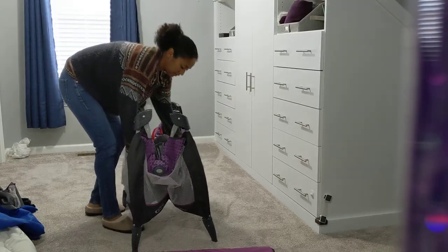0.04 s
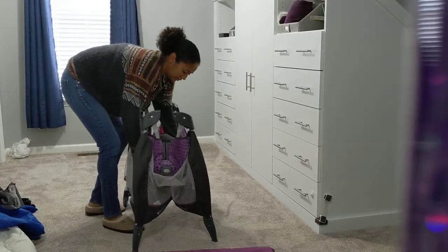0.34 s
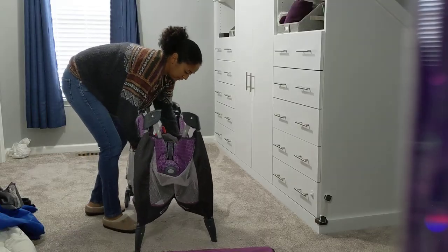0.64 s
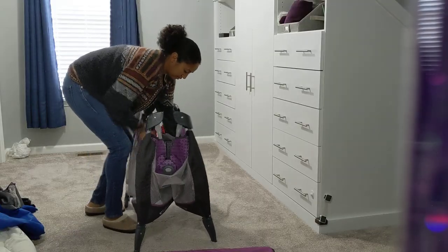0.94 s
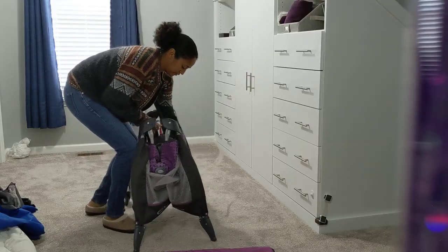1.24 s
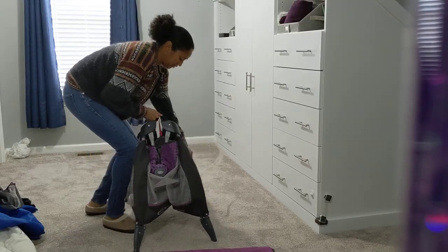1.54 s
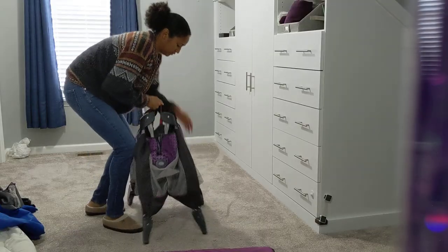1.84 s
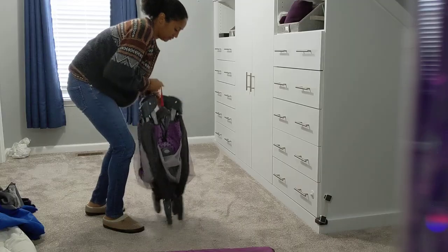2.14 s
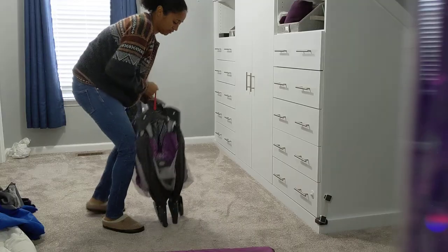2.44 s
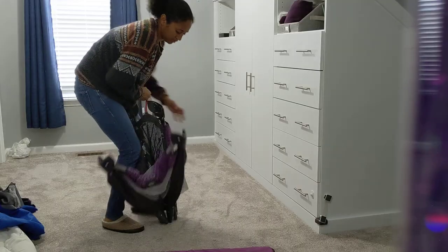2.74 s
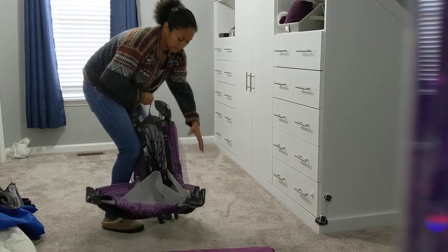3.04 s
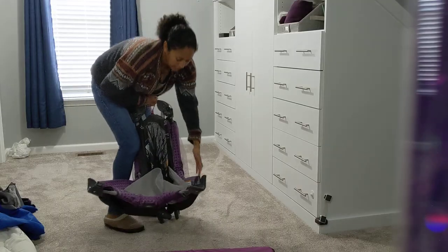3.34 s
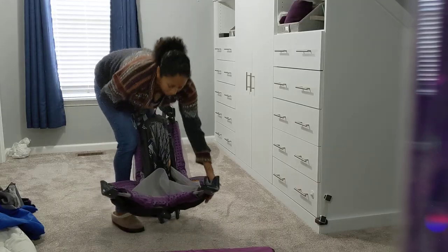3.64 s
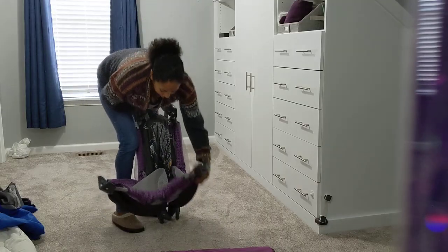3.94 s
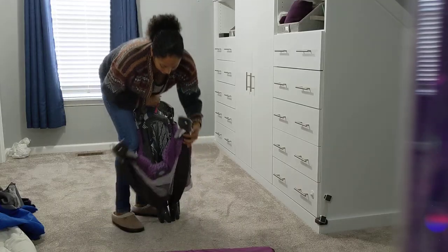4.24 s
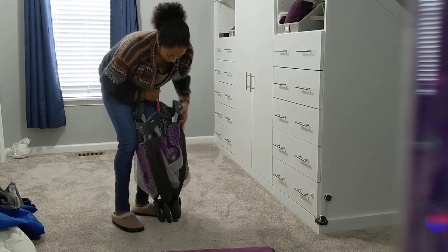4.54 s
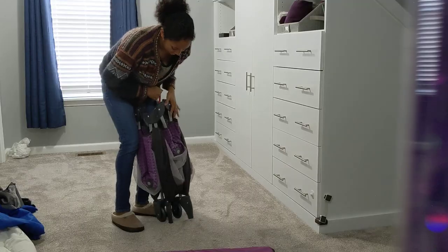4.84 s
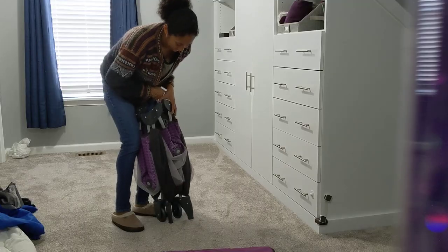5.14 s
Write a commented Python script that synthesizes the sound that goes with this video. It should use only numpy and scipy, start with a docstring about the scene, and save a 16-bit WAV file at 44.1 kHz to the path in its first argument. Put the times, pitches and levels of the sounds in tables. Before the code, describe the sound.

Locks snap and the legs of a folding cot clack together, amid nylon rustle, loose rattles and dull padded bumps.

```python
"""A carpeted bedroom, with a stereo pair of microphones close to a travel cot being folded up.
Over the quiet rumble of the house, nylon rustles, loose joints rattle and padded parts bump dully.
In front, the locks let go, the legs clap together and the top rails drop and are lifted again:
each click cracks a plastic shell and sets the metal tubes and plastic hubs ringing."""
import sys
import numpy as np
from scipy import signal
from scipy.fft import rfft, irfft
from scipy.io import wavfile

SR = 44100
rng = np.random.default_rng(int(sys.argv[2]) if len(sys.argv) > 2 else 0)


def unload_audio(sound):
    """Save the sound as a 16-bit wav file, at the path given as the first command line argument."""
    columns = np.transpose(np.atleast_2d(sound))
    # keep every value between -1 and 1, then stretch to whole-number steps
    steps = np.round(np.clip(columns, -1, 1) * 32767)
    wavfile.write(sys.argv[1], SR, steps.astype(np.int16))


N = 229496

# Clicks of locks and joints; ring and snap are relative to the level:
# (time [s], level [dB], ring [dB], pitch of the struck part [Hz], snap [dB], chatter [s])
CLICKS = [(.004, -50, 2.5, 1340, -6.5, .004), (0.086, -61.5, -1, 1640, -18, 0.009),
          (.308, -52.5, 3, 1684, -3.5, .003), (.572, -44, 2, 1739, -5.5, 0.003),
          (.59, -48, -18, 1805, -.5, .002), (.602, -52.5, -7, 1730, -8, 0.0019),
          (.646, -69, 9, 1690, -15, 0.0025), (.665, -73, 11.5, 935, -15, 0.0036),
          (0.911, -47, -4, 1654, -9, 0.0037), (1.011, -48.5, -20, 1380, 1.5, 0.003),
          (1.032, -54.5, 4, 1400, -15, 0.0069), (1.104, -46, -5, 1415, -6, 0.0084),
          (1.145, -45, 3, 1593, 1.5, 0.0029), (1.229, -45.5, -7, 1650, 0, 0.0024),
          (1.275, -43.5, -6, 1590, -5, .0033), (1.284, -34, -1.5, 1602, 1, 0.0026),
          (1.298, -41.5, -7, 1535, 1, 0.0027), (1.657, -61.5, -17, 1670, 5.5, .004),
          (1.844, -52, 1, 1745, -6, 0.0028), (1.909, -37, 3, 1726, -5, .002),
          (1.921, -29, -2.5, 1720, -0.5, 0.0019), (1.979, -32.5, -4, 1760, -2, 0.005),
          (2.059, -52, -2, 1670, 1, 0.0057), (2.265, -34.5, 1, 1416, -10, .003),
          (2.272, -23.5, 2, 1446, 1, 0.0067), (2.288, -26, -9.5, 1700, 2, 0.0028),
          (2.602, -50, -0.5, 1745, -1.5, 0.0039), (2.643, -55, 3, 1770, -14, 0.0087),
          (2.679, -55.5, 0.5, 1580, -18, .003), (2.751, -55, 1.5, 1734, 2.5, .0035),
          (2.805, -38, -17, 1640, -2, 0.0055), (2.862, -39.5, -18, 1750, -27, 0.014),
          (2.895, -42, -5, 1670, -23, 0.0048), (2.919, -36, -6.5, 1720, -1, 0.0048),
          (2.95, -38, -4.5, 1660, -4.5, 0.003), (3.169, -53, -7.5, 1930, -8, 0.0014),
          (3.991, -59, 3, 1674, -2, 0.013), (4.039, -49, -0.5, 1700, -11, .005),
          (4.094, -48.5, 7, 1685, 2, 0.0073), (4.119, -44, -9, 1880, -7.5, 0.0034),
          (4.365, -55, 1, 1706, -11, 0.019), (4.461, -48, -9.5, 1650, -5, 0.011),
          (4.737, -49, 4, 1640, 4, 0.0065), (4.793, -48.5, -23, 1400, -3, 0.0017),
          (4.829, -54.5, 1.5, 1390, -10, .005)]
# Modes of the metal tubes and of the plastic hubs: (frequency [Hz], level [dB], t60 [s])
TUBE_MODES = [(1476, -6, 0.041), (1678, -6, 0.063), (1716, -2, 0.08), (2206, -10.5, 0.086),
              (3253, -1, 0.031), (3285, -2, 0.044), (3574, -18, 0.037), (3792, -5.5, 0.045),
              (4310, -4.5, 0.044)]
HUB_MODES = [(477, -25, .1), (880, -10.5, 0.06), (1013, -9.5, 0.12), (1166, 0, 0.057), (1299, 0.5, 0.098),
             (1403, 5, 0.046), (1460, -7, 0.068), (1564, 6, 0.04), (2470, -3.5, 0.1), (2490, -20, 0.053),
             (3058, -9, 0.049), (3124, -10, 0.15), (3450, -30, 0.054), (3642, -10.5, 0.13),
             (3450, -15.5, 0.12), (3957, -3, 0.12)]
# Spectra of a plastic shell's crack and of the frame's low knock: (frequency [Hz], level [dB])
SHELL_SPECTRUM = [(250, -32), (750, -21), (1000, -10), (1180, -6.5), (1620, -1.5), (1980, -3.5), (2350, -5),
                  (2650, -4), (3100, 0.5), (3700, -1), (4700, -7.5), (5700, -13.5), (7000, -21),
                  (15000, -30)]
KNOCK_SPECTRUM = [(80, -37), (170, -10), (280, -21), (390, 0), (520, 1), (690, -8.5), (920, 3),
                  (1300, -6.5), (2500, -34)]


def amp(db):
    return 10 ** (np.asarray(db) / 20)


def unit(x):
    """Scales to energy 1."""
    return x / np.sqrt(np.sum(x ** 2) + 1e-20)


def value_at(points, hz):
    """A curve's value, on a log-frequency axis."""
    f, value = np.transpose(points)
    return np.interp(np.log(hz + 1), np.log(f), value)


def add(mix, s, sound):
    """Mixes a stereo sound in at time s."""
    part = mix[:, max(round(s * SR), 0):][:, :sound.shape[1]]
    part += sound[:, :part.shape[1]]


def impulse(spectrum):
    """The minimum-phase response with a given spectrum: a sharp start and a quick decay."""
    log_gain = np.log(amp(value_at(spectrum, abs(np.fft.fftfreq(4096, 1 / SR)))))
    return np.fft.ifft(np.exp(np.conj(signal.hilbert(log_gain)))).real[:2048]


def colour(x, spectrum):
    """Filters by a spectrum."""
    return signal.oaconvolve(x, impulse(spectrum))[:len(x)]


def diffuse(size):
    """Noise arriving from all sides at two closely spaced microphones."""
    # Likeness of left and right: (frequency [Hz], correlation [-1..1])
    likeness = [(60, 0.95), (130, 0.91), (290, 0.089), (500, -0.79), (900, 0.92), (1500, 0.67),
                (2600, -0.038)]
    a, b = rfft(rng.standard_normal((2, size)))
    same = np.clip(value_at(likeness, np.fft.rfftfreq(size, 1 / SR)), -1, 1)
    return irfft([a, same * a + np.sqrt(1 - same ** 2) * b], size)


def room_tone(level_db=-59):
    """Low rumble of the house with a faint hiss."""
    # The still bedroom: (frequency [Hz], level [dB])
    air_spectrum = [(15, -2.5), (42, -2), (90, -7), (140, -13), (290, -18.5), (420, -12), (540, -7),
                    (750, -25.5), (1200, -24), (2200, -35), (3500, -24), (7000, -29), (14000, -26),
                    (15200, -28.5)]
    return amp(level_db) * np.sqrt(N) * np.array([unit(colour(x, air_spectrum)) for x in diffuse(N)])


def blow(chatter_s, direct_db=-4, near_db=-5, near_s=0.0075, walls_db=-4, walls_s=0.038, size=16000):
    """Tiny contacts as two parts seat, their echoes off frame, wardrobe and walls, and the room's tail."""
    # Reverberation of the bedroom: (frequency [Hz], t60 [s])
    room_t60 = [(100, 0.34), (500, 0.39), (1500, 0.21), (3500, 0.32), (8000, 0.25), (15000, 0.098)]
    hz, frame_s, bands = signal.stft(diffuse(size), SR, nperseg=256)
    decay = amp(-60 * frame_s / value_at(room_t60, hz)[:, None])
    tail = signal.istft(bands * decay, SR, nperseg=256)[1][:, :size]
    t = np.arange(size) / SR
    u = t / max(chatter_s, 1 / SR)
    contacts = unit(rng.standard_normal(size) ** 3 * u * np.exp(-u ** 2 / 2))  # a few are far harder
    direct = np.array([np.roll(contacts, 25), contacts])  # reaches the right microphone first
    build = 1 - np.exp(-u ** 2)  # echoes pile up while the contacts last
    echoes = build * rng.standard_normal((2, size)) * (rng.random((2, size)) < 3000 / SR)
    near = unit(echoes * t * np.exp(-(t / near_s) ** 4))  # nearby surfaces answer in a tight bunch
    walls = unit(echoes[::-1] * np.exp(-t / walls_s))
    room = unit(tail * build) + amp(near_db) * near + amp(walls_db) * walls
    return amp(direct_db) * direct + np.sqrt(2) * room


def strike(contact, body, db):
    """A body's response to a blow, with the energy of 20 ms at the given level."""
    return amp(db) * np.sqrt(SR / 50) * unit(signal.fftconvolve(contact, body[None], axes=1))


def ring(modes, size=7000, detune=0.0031):
    """Dying modes; the grip shifts them a little from blow to blow."""
    hz, db, t60 = np.transpose(modes)[:, :, None]
    t = np.arange(size) / SR
    shift, polarity = rng.standard_normal((2, len(modes), 1))
    decay = np.exp(-np.log(1000) * t / t60)
    tones = np.sin(2 * np.pi * hz * (1 + detune * shift) * t)
    return unit(np.sum(np.sign(polarity) * amp(db) * decay * tones, 0))


def slips(per_s, spread_db):
    """Random tiny slips of uneven size, rms 1."""
    sizes = amp(spread_db * np.minimum(rng.exponential(1, N), 4)) * rng.choice([-1, 1], N)
    return np.sqrt(N) * unit(sizes * (rng.random(N) < per_s / SR))


def rubbing(spectrum, per_s, spread_db):
    """A stream of slips with a given spectrum, rms 1."""
    return np.sqrt(N) * unit(colour(slips(per_s, spread_db), spectrum))


def effort(t, rise_s=0.05, fade_db_per_s=131):
    """Strength of rustle and of rattle: each move of the arms swells, holds and dies away."""
    # Tugging the release, lifting the middle, dropping and raising the rails, pressing the bundle shut:
    # (start [s], length [s], rustle [dB], rattle [dB])
    moves = [(-.05, 1, -73.5, -68.5), (0.928, 0.21, -62.5, -60), (1.094, 0.22, -57.5, -52),
             (1.434, 0.32, -67, -69.5), (1.76, .17, -60.5, -61), (1.96, 0.43, -59.5, -56.5),
             (2.343, .17, -62.5, -51), (2.53, 0.27, -61.5, -58), (2.785, .22, -56, -51),
             (3.363, .6, -72, -75.5), (3.957, 0.62, -65, -63.5), (4.616, 0.2, -59.5, -59)]
    start, length, rustle_db, rattle_db = np.transpose(moves)[:, :, None]
    swell = np.clip((t - start) / rise_s, 0, 1)
    fade = amp(-fade_db_per_s * np.maximum(t - start - length, 0))
    return [np.linalg.norm(swell * fade * amp(db), axis=0) for db in (rustle_db, rattle_db)]


def handling(cloth_db=3, tube_db=-11, hub_db=-10, knock_db=-7):
    """Nylon slides over itself and under a hand while loose joints tick against the frame."""
    # Nylon on nylon, and a hand on nylon: (frequency [Hz], level [dB])
    nylon_spectrum = [(150, -20), (500, 8.5), (1500, -2), (3500, -5.5), (6000, 0), (10000, 4.5), (13000, 4),
                      (16000, -6)]
    hand_spectrum = [(1000, -22), (4000, -3), (8000, -8.5), (10000, 2.5), (12500, 1), (16000, -7)]
    # Quick slides of the hand: (time [s], level [dB], half length [s])
    swishes = [(2.495, -43.5, 0.0076), (3.714, -53, 0.063), (4.475, -62, 0.04), (4.757, -62, 0.13)]
    t = np.arange(N) / SR
    rustle, rattle = effort(t)
    out = rubbing(nylon_spectrum, per_s=1400, spread_db=4.0) * amp(cloth_db) * rustle
    hand_speed = sum(amp(db) * np.exp(-((t - at) / half) ** 2) for at, db, half in swishes)
    out += hand_speed * rubbing(hand_spectrum, per_s=3100, spread_db=3.5)
    for db, part in [(0, impulse(SHELL_SPECTRUM)), (tube_db, ring(TUBE_MODES)),
                     (hub_db, ring(HUB_MODES)), (knock_db, impulse(KNOCK_SPECTRUM))]:
        ticks = slips(per_s=170, spread_db=4.0) * amp(db) * rattle
        out += signal.oaconvolve(ticks, unit(part))[:N]
    path_to_mics = np.sqrt(2) * unit(blow(1 / SR))
    return signal.oaconvolve(out[None], path_to_mics, axes=1)[:, :N]


def bumps(chatter_s=0.003, skirt_db=-20):
    """Feet and rails land; carpet and padding leave only a dull push."""
    # Padded landings: (time [s], level [dB], low edge [Hz], high edge [Hz])
    landings = [(1.071, -52.5, 70, 108), (1.165, -56.5, 161, 220), (2.537, -45, 390, 1530),
                (2.55, -45.5, 179, 207), (2.898, -57.5, 170, 263), (2.99, -52, 170, 266),
                (3.351, -53, 297, 1570), (3.384, -56, 160, 330), (3.721, -44, 357, 1620),
                (4.227, -56, 190, 280), (4.742, -46, 400, 1710)]
    out = np.zeros((2, N))
    for s, db, low, high in landings:
        push = impulse([(low / 2, skirt_db), (low, 0), (high, -2), (high * 2, skirt_db), (high * 10, -55)])
        add(out, s, strike(blow(chatter_s, direct_db=2), push, db))
    return out


def slack(s, unlock_s=0.59, loose_s=2.08):
    """How far the frame has gone from taut (0) to loose (1)."""
    return np.clip((s - unlock_s) / (loose_s - unlock_s), 0, 1)


def pings(t60=0.031, rise_s=0.0015, overtone_ratio=2.04, middling_db=-43, full_overtone_db=-44.5):
    """The struck part's own mode and its overtone stand out, swelling as the vibration spreads along it."""
    out = np.zeros((2, N))
    for s, db, ring_db, hz, _, _ in CLICKS:
        ping_db = ring_db - 3 - 0.35 * (db - middling_db)  # soft blows favour one mode, hard ones many
        overtone_db = 2.5 + 0.4 * ring_db
        overtone_db += 1.9 * min(db - full_overtone_db, 0)  # drops away in weak blows
        overtone_db -= 8.5 * slack(s)  # limp cloth damps it
        for mode_hz, mode_db in [(hz, ping_db), (hz * overtone_ratio, overtone_db)]:
            tone = ring([(mode_hz, 0, t60)])
            swell = 1 - np.exp(-np.arange(len(tone)) / SR / rise_s)
            add(out, s, strike(blow(1 / SR, direct_db=0), tone * swell, db + mode_db))
    return out


def knock_share(s, chatter_s, taut_db=-21, slack_db=-8.5, usual_chatter_s=0.0028):
    """Low knock against crack in dB: more in a slack frame, and when the contacts last longer."""
    return taut_db + slack(s) * (slack_db - taut_db) + np.log2(chatter_s / usual_chatter_s)


def clicks(hub_hz=1500, tube_hz=1700, first_touch=0.3, hardness=0.1, firm_db=-36):
    """Each lock or joint cracks its damped plastic shell; its first touch sets tubes and hubs ringing."""
    # The plastic's bright snap: (frequency [Hz], level [dB])
    snap_spectrum = [(2000, -34), (4200, -8.5), (5600, -3.5), (8000, -4), (10300, -3), (12000, -6),
                     (14000, -6.5), (16000, -28)]
    shell, snap, knock = impulse(SHELL_SPECTRUM), impulse(snap_spectrum), impulse(KNOCK_SPECTRUM)
    out = np.zeros((2, N))
    for s, db, ring_db, hz, snap_db, chatter_s in CLICKS:
        # A blow near a hub sounds low, one on a tube high; the other part rings along more weakly.
        on_tube = np.clip((hz - hub_hz) / (tube_hz - hub_hz), 0, 1)
        tube_db = ring_db - 5 * (1 - on_tube)
        hub_db = ring_db - 10 * on_tube
        crack, edge = blow(chatter_s, direct_db=-3), blow(chatter_s, direct_db=-3)
        touch = blow(chatter_s * first_touch, direct_db=-1)
        crisp = colour(snap, [(10000, 0), (14000, hardness * (db - firm_db))])  # hard blows reach higher
        add(out, s, strike(crack, shell, db))
        add(out, s, strike(touch, ring(TUBE_MODES), db + tube_db))
        add(out, s, strike(touch, ring(HUB_MODES), db + hub_db))
        add(out, s, strike(edge, crisp, db + snap_db))
        add(out, s, strike(edge, knock, db + knock_share(s, chatter_s)))
    return out


def scene():
    """The frame, the cloth and the room as they reach the pair."""
    return clicks() + pings() + bumps() + handling() + room_tone()


def record(dry, band_limit_hz=15850):
    """Both microphones ripple in the treble and the right one is shaded; then the band limit."""
    # Response of both microphones, and of the right against the left: (frequency [Hz], gain [dB])
    mic_response = [(4700, -0.5), (5600, 3), (6700, -3.5), (7700, 1.5), (8500, -3.5), (9600, 2),
                    (11000, -5), (12000, 1.5), (12800, -9), (16000, 0)]
    right_shading = [(50, -0.8), (200, -4), (500, -4), (1300, -6.5), (2200, -3.5), (4000, -9.5),
                     (8000, -5.5), (12000, -11.5), (16000, 0.5)]
    left = colour(dry[0], mic_response)
    right = colour(colour(dry[1], mic_response), right_shading)
    lowpass = signal.firwin(511, band_limit_hz, window=("kaiser", 9), fs=SR)
    return signal.oaconvolve(np.array([left, right]), lowpass[None], "same")


dry = scene()
out = record(dry)
unload_audio(out)
```